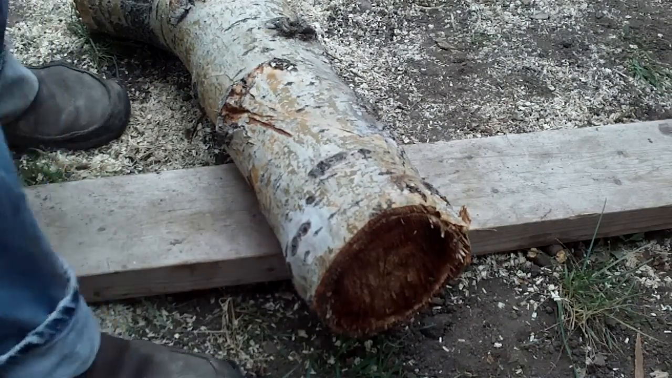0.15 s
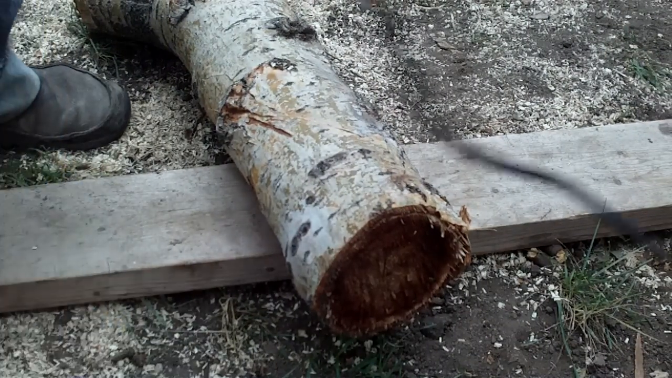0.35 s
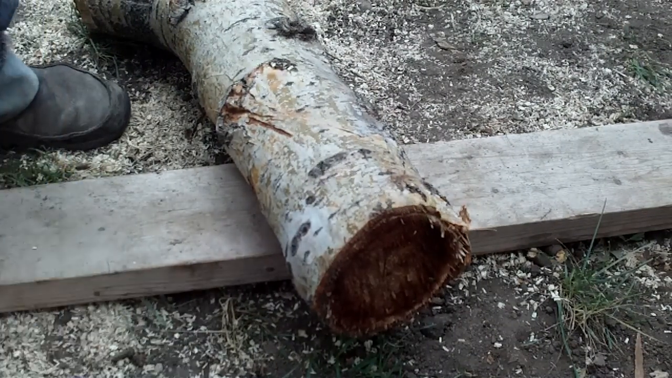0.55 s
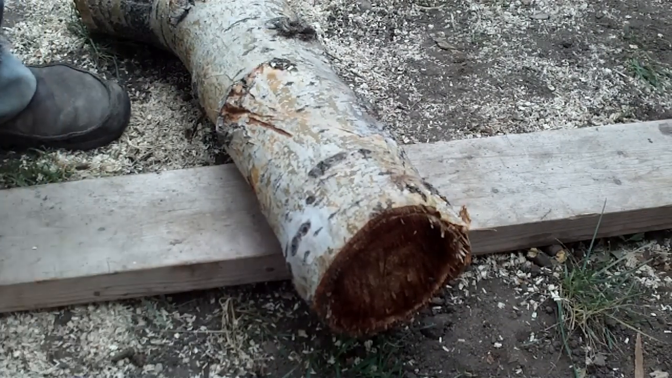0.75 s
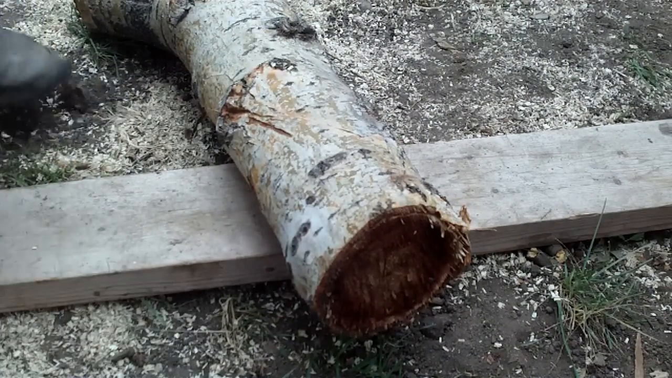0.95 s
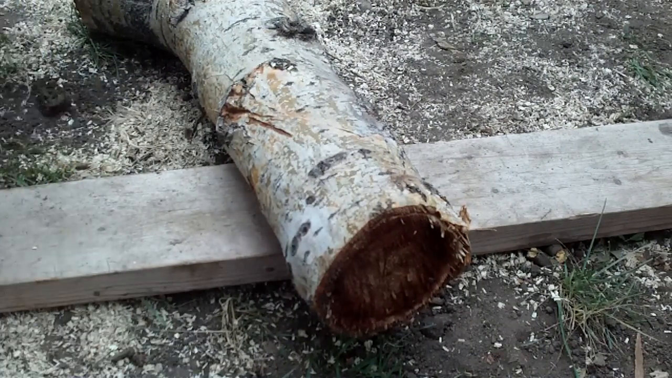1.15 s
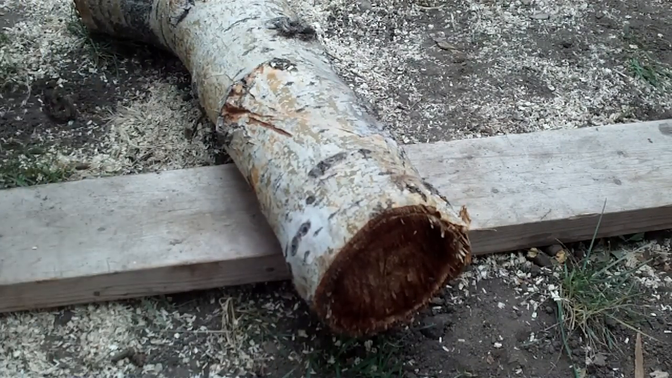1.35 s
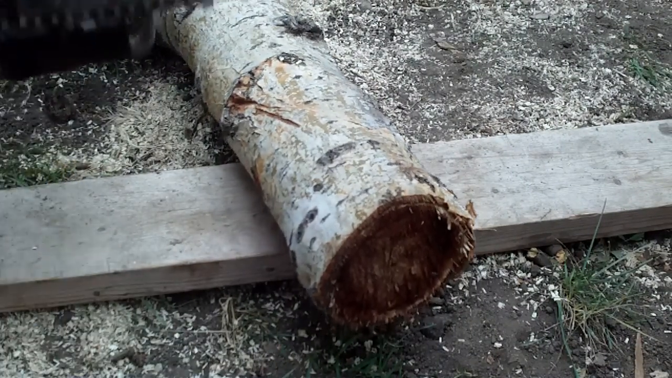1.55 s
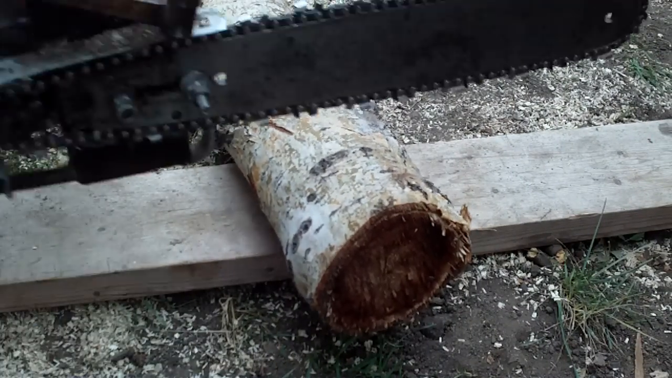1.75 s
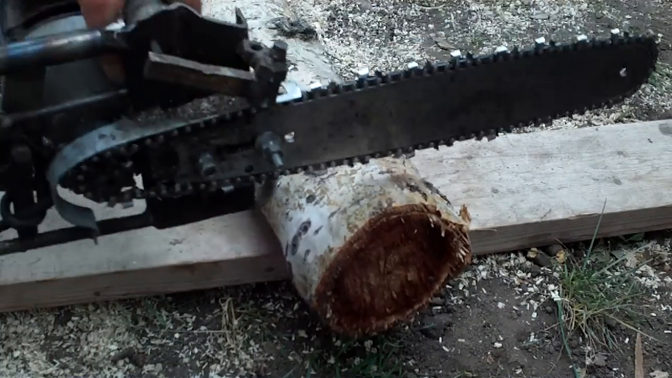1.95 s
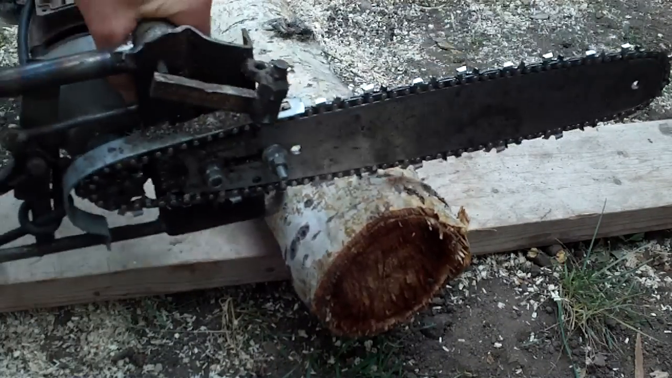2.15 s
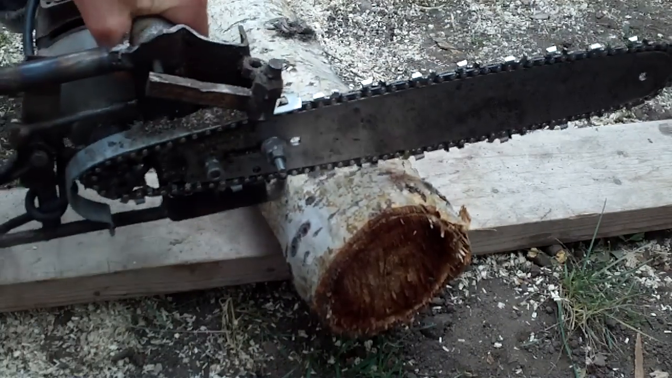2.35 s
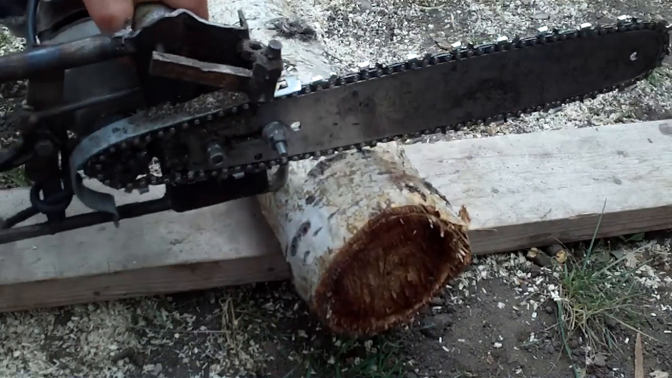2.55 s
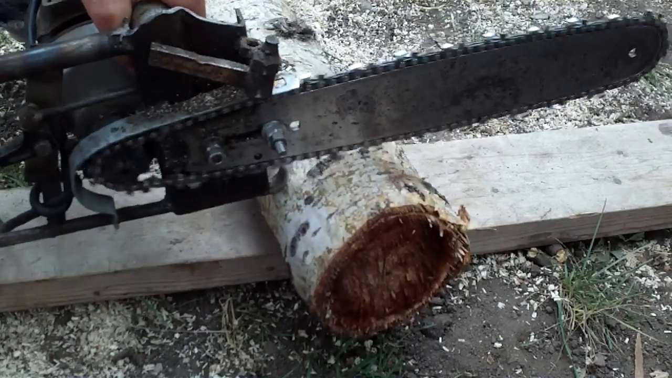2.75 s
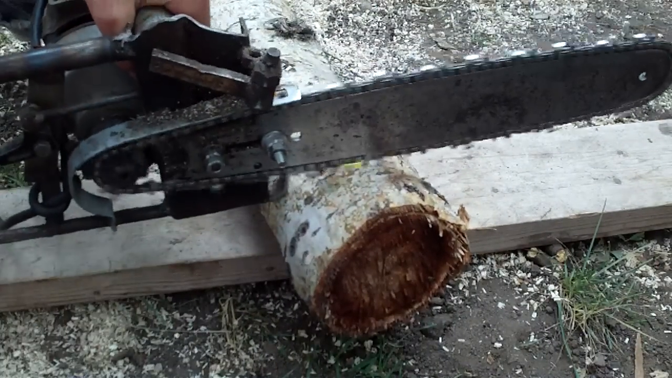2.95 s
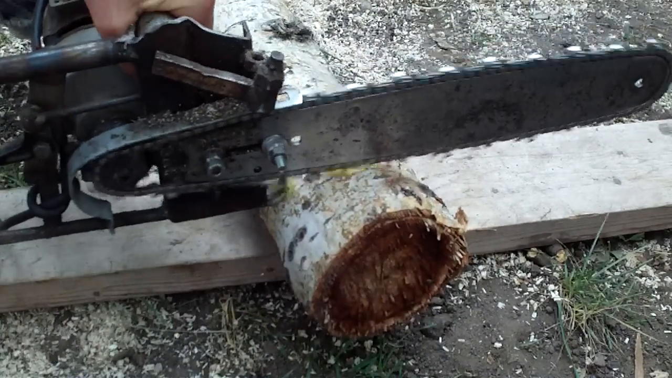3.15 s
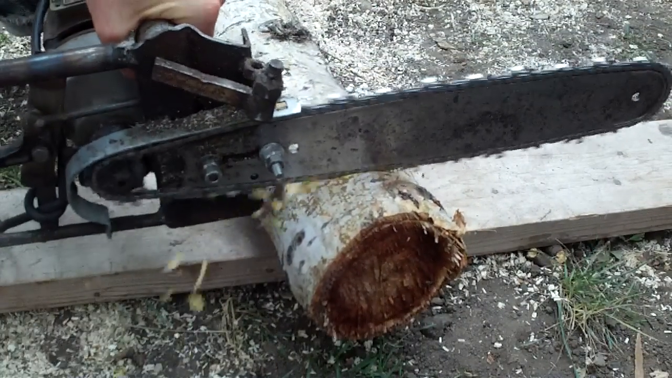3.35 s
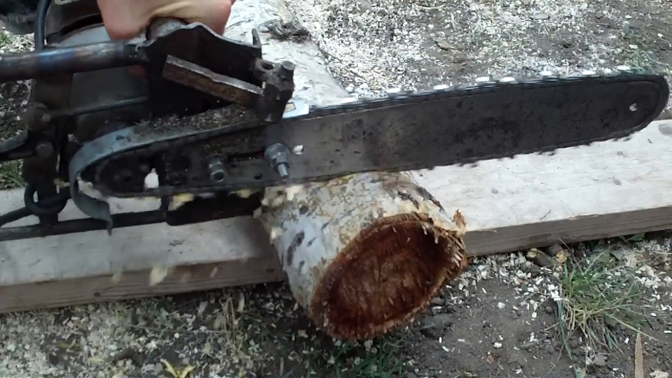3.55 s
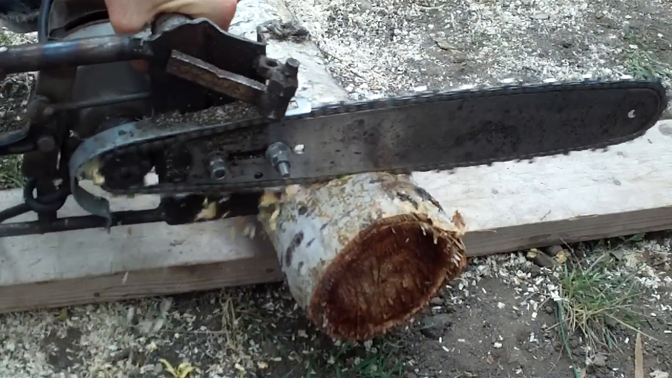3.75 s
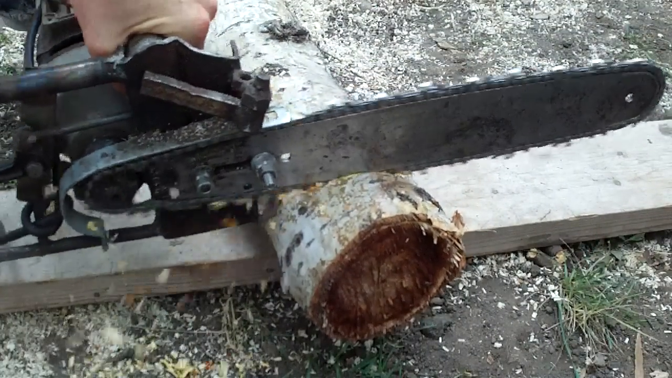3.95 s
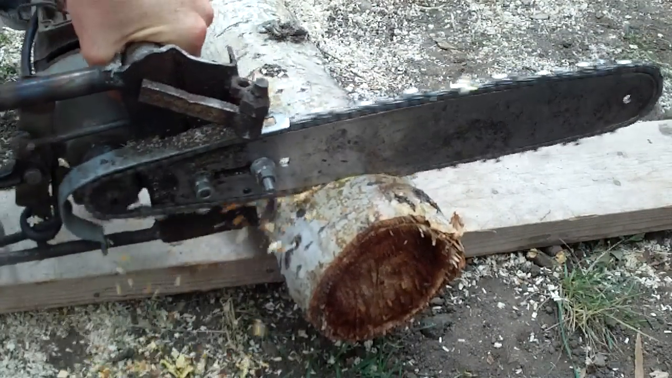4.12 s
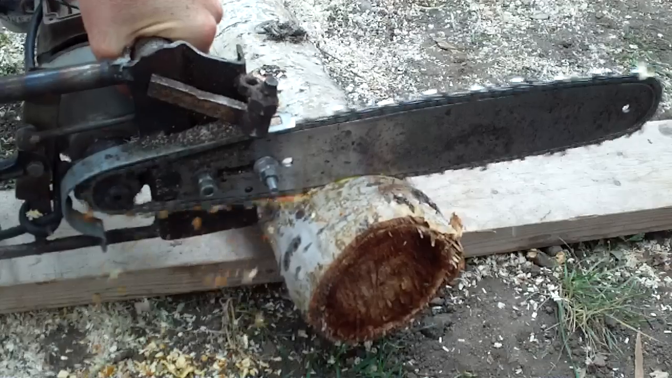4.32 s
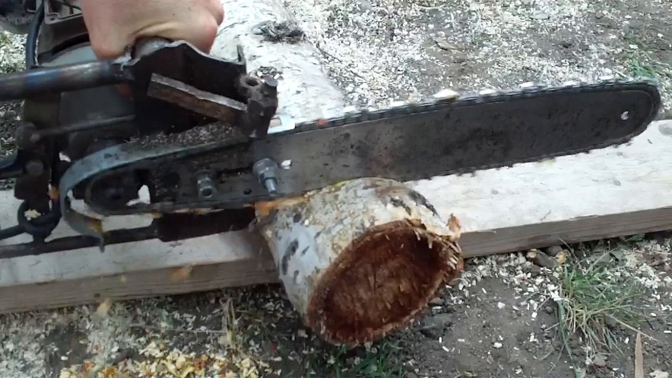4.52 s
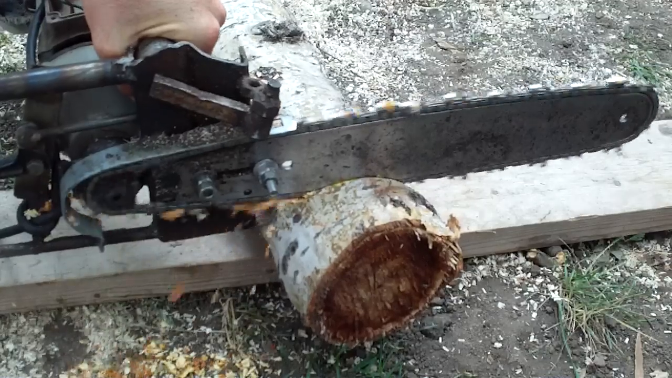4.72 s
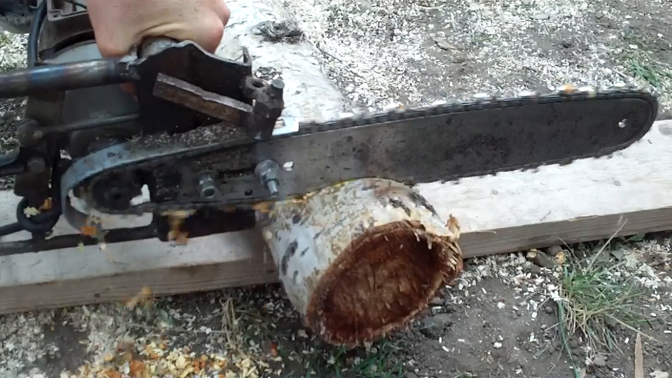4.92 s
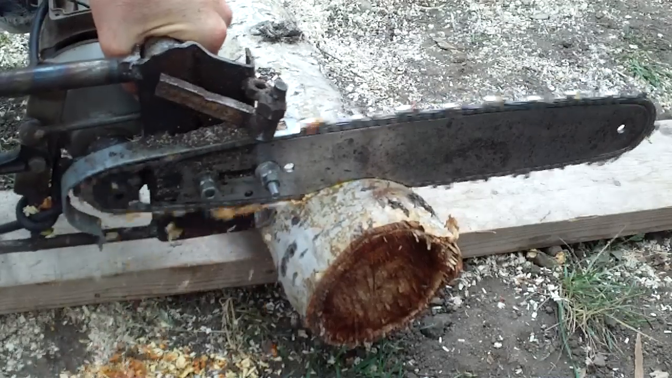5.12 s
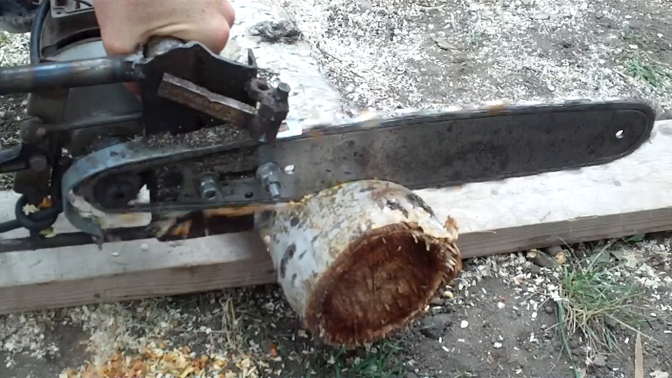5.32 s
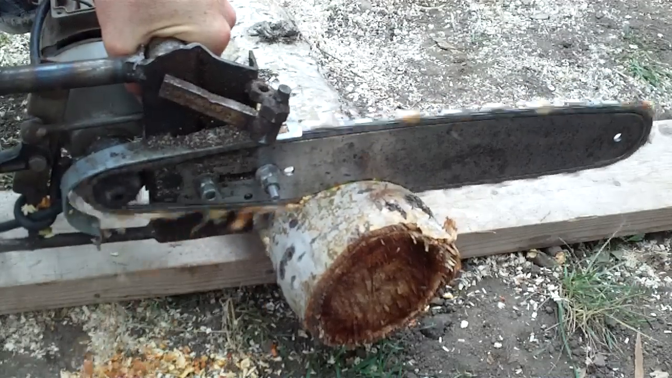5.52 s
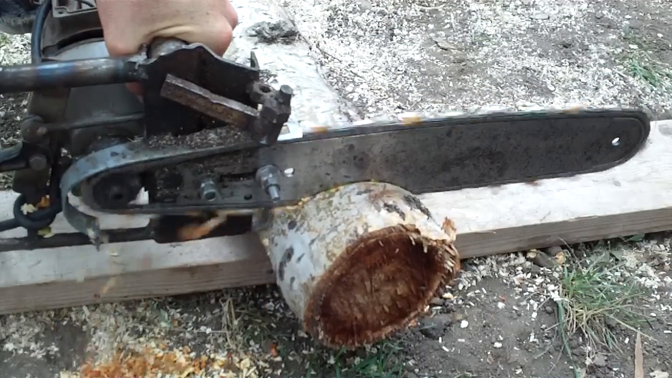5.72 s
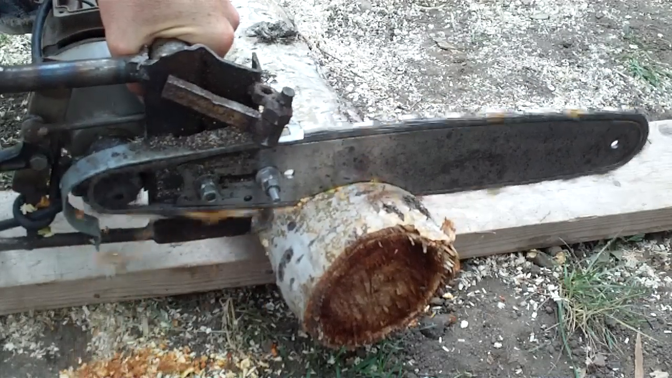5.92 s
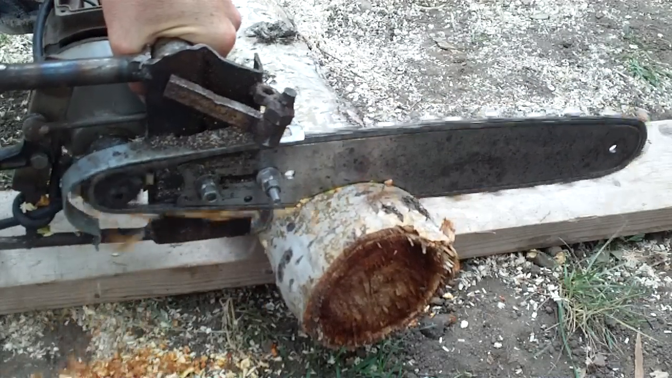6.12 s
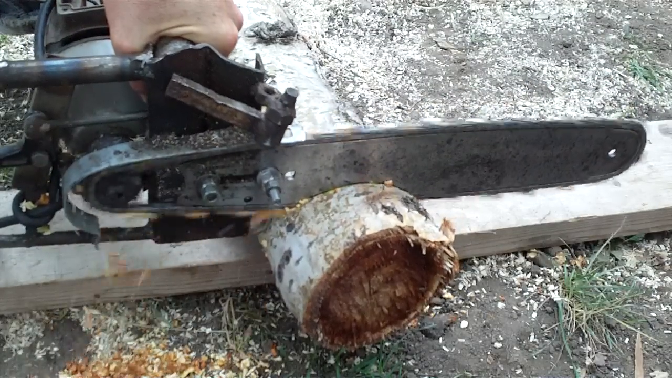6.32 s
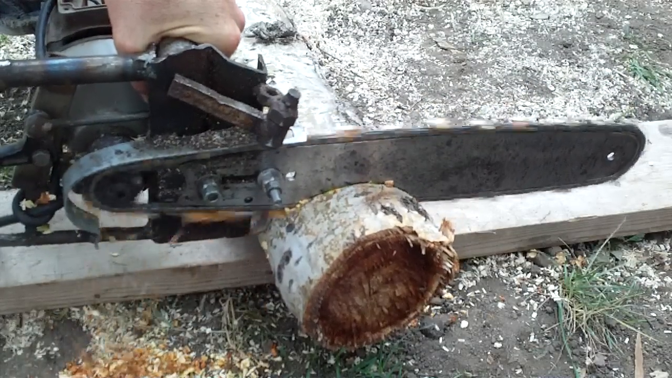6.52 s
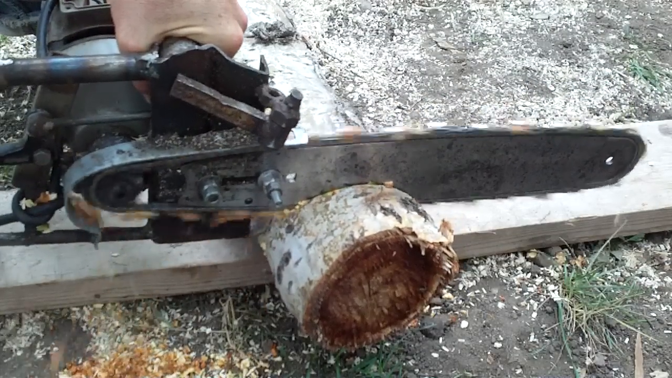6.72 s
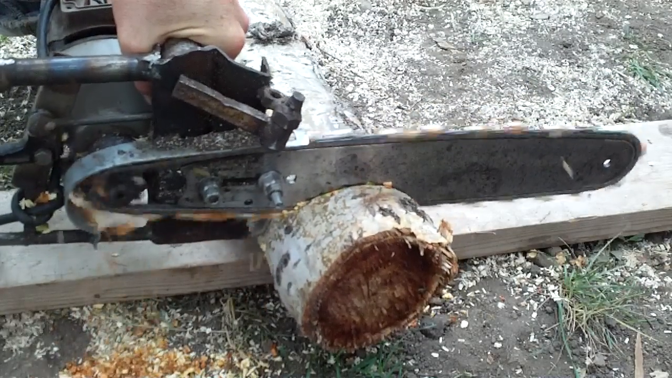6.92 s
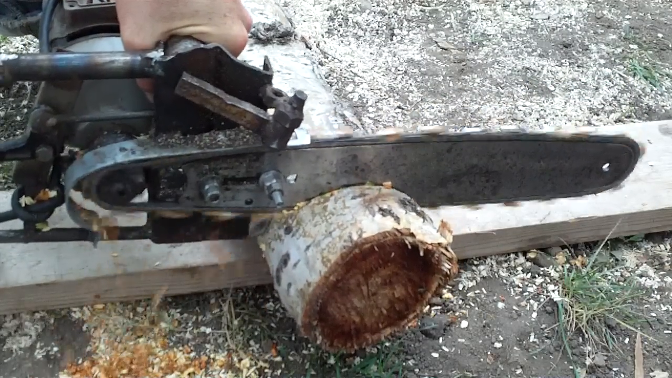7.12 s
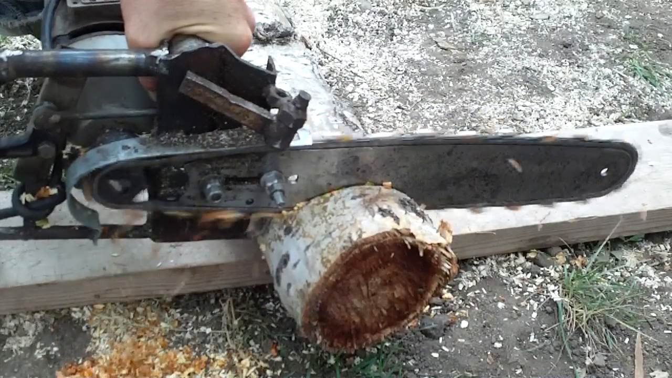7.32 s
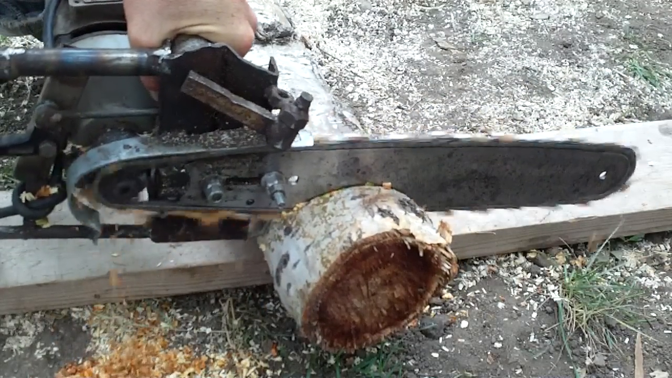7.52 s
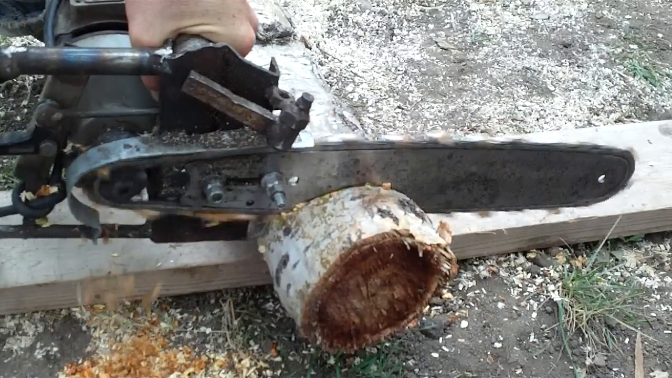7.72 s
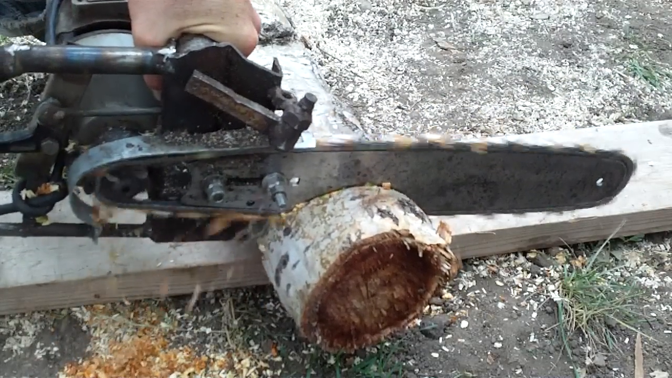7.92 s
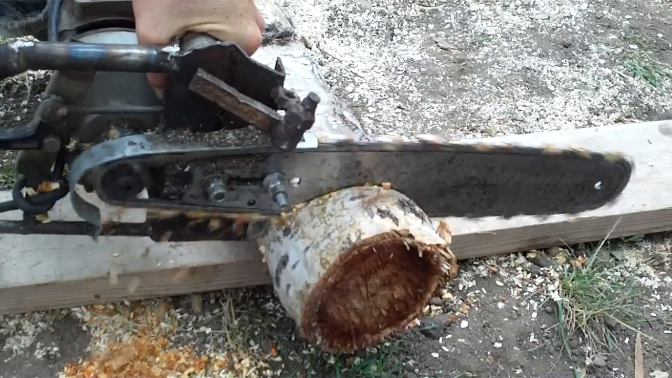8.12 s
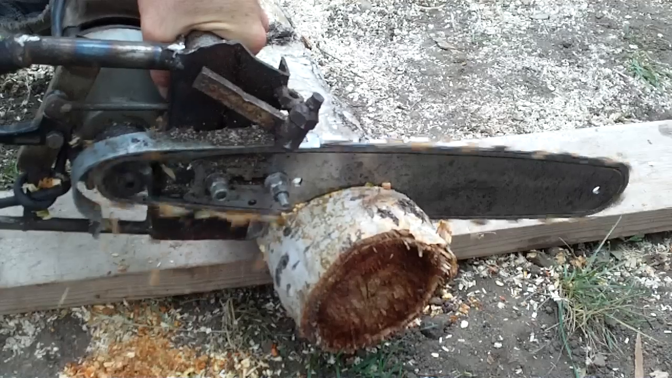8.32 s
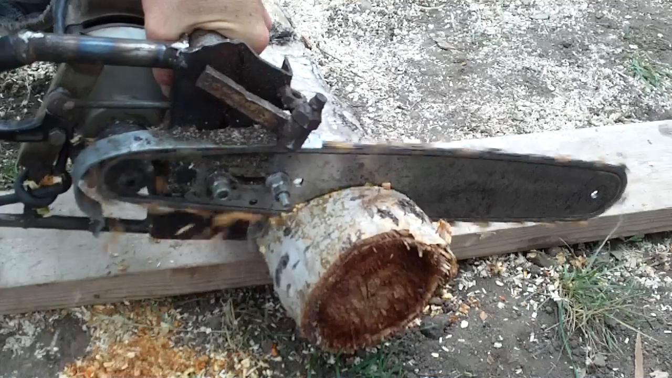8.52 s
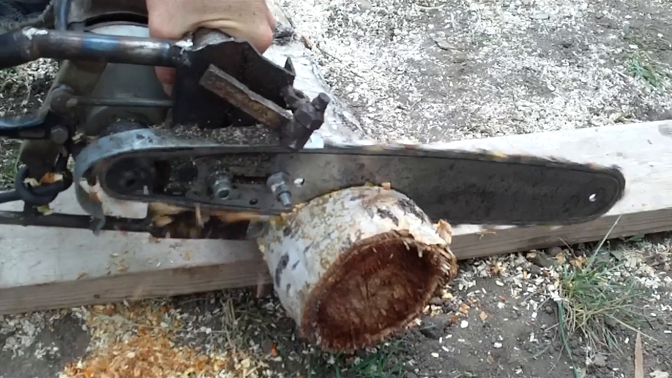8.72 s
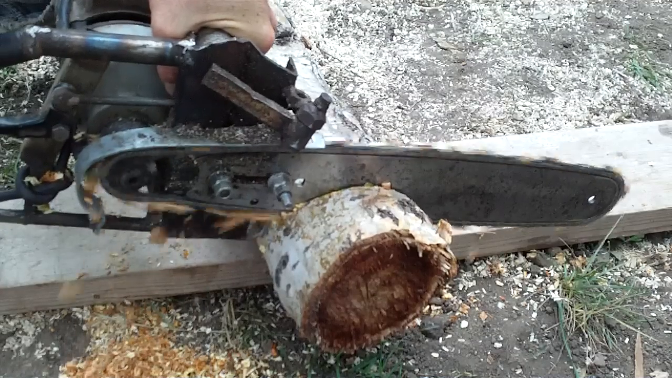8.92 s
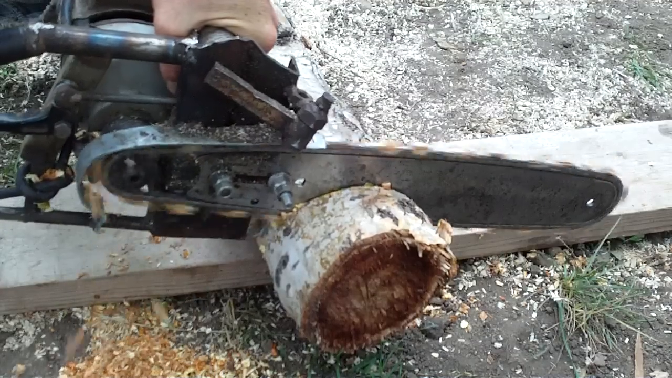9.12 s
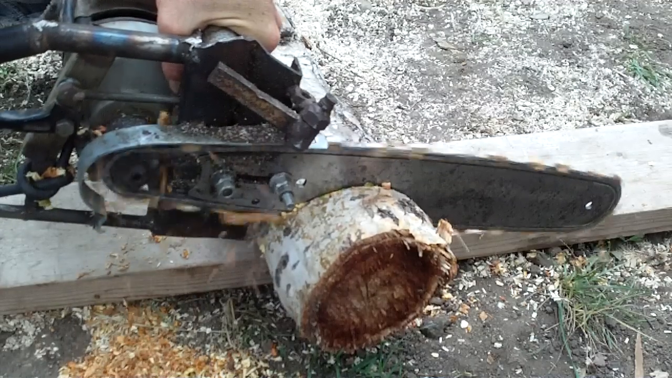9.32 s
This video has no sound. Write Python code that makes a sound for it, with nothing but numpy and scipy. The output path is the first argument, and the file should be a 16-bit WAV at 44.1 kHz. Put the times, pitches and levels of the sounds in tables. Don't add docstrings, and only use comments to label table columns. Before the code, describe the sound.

Outdoors in a yard, a small engine drones low in the distance while sparrows chirp and clothes rustle. Faint knocks, scuffs and ticks come from handling a saw, then a sharp ringing clink of its steel bar. A switch cracks and an electric motor races up to a piercing whine; the chain bites the log, the pitch sags and rough, hissing cutting continues to the end. Close microphone, light wall echo.

```python
import sys
import numpy as np
from scipy import signal
from scipy.fft import rfft, irfft
from scipy.io import wavfile
from scipy.ndimage import uniform_filter1d, map_coordinates

SR = 44100
rng = np.random.default_rng(int(sys.argv[2]) if len(sys.argv) > 2 else 0)


def dump(signal):
    limited = np.clip(np.atleast_2d(signal).T, -1, 1)
    pcm = np.round(limited * 32767).astype(np.int16)
    wavfile.write(sys.argv[1], SR, pcm)


def to_linear_factor(level_db):
    exponent = np.asarray(level_db, float) / 20
    return 10 ** exponent


N = 417186
T_S = np.arange(N) / SR
BARS, TEETH = 12, 9
LEAD = SR // 10


def unit(x):
    return x / np.sqrt(np.mean(x ** 2) + 1e-20)


def along(points, hz):
    f, v = np.transpose(points)
    return np.interp(np.log(hz + 1), np.log(f + 1), v)


def curves(rows):
    s, *cols = np.transpose(rows)
    return [np.interp(T_S, s, col) for col in cols]


def bumps(rows):
    return sum(size * np.exp(-((T_S - s) / half) ** 2) for s, size, half in rows)


def bells(hz, modes):
    return sum(db / (1 + (2 * (hz - centre) / width) ** 2) for centre, width, db in modes)


def wobble(rate):
    knots = rng.standard_normal(int(N * rate / SR) + 4)
    return map_coordinates(knots, [np.arange(N) * rate / SR])


def rush(spectrum, patchy_db, drive=1):
    hz, _, z = signal.stft(drive * rng.standard_normal(N), SR, nperseg=512)
    field = uniform_filter1d(rng.standard_normal(z.shape), 6, 0)
    field = uniform_filter1d(field, 10, 1)
    colour_db = along([(1, -120), *spectrum, (SR / 2, -120)], hz)
    z = z * to_linear_factor(patchy_db * unit(field) + colour_db[:, None])
    return unit(signal.istft(z, nperseg=512)[1][:N])


def tone(turns, order, db, flutter_db, rate):
    phase = 2 * np.pi * (order * turns + rng.random()) + 0.23 * wobble(4 * rate)
    return np.sqrt(2) * to_linear_factor(db + flutter_db * wobble(rate)) * np.sin(phase)


def faint(turns, order, db, drift_db):
    knots = rng.standard_normal(36)
    drift = np.interp(np.linspace(0, len(knots) - 1, N), np.arange(len(knots)), knots)
    return np.sqrt(2) * to_linear_factor(db + drift_db * drift) * np.sin(2 * np.pi * (order * turns + rng.random()))


def motor():
    # (time [s], bar-passing speed lost [Hz])
    sag = [(3.204, 0), (3.356, 79), (3.757, 277), (4.018, 289), (4.187, 364), (4.212, 410), (4.683, 525),
           (5.124, 511), (5.374, 587), (5.674, 626), (6.211, 640), (6.388, 602), (6.837, 654), (6.95, 722),
           (7.783, 699), (8.38, 813), (9.286, 665), (9.377, 697)]
    # (time [s], speed lost [Hz], half length [s])
    bites = [(2.745, 130, .065), (3.593, 18, 0.087), (4.25, 23, 0.033), (5.553, 78, 0.07),
             (5.928, 28, 0.165), (6.248, 19, 0.063), (6.898, 68, 0.063), (7.127, -20, 0.054),
             (7.362, 55, 0.098), (7.601, 54, 0.107), (8.355, 42, 0.05), (8.487, -49, 0.158),
             (8.772, 57, 0.12), (8.955, 52, 0.085)]
    # (time [s], speed lost [Hz], half length [s])
    tugs = [(3.43, -9, 0.025), (3.62, 4, 0.06), (3.84, 5, 0.025), (3.93, -7, 0.025), (4.37, 6, 0.025),
            (4.69, -6, 0.025), (4.9, 5, 0.025), (4.97, -7, 0.025), (5.11, 7, 0.025), (5.75, -5, 0.025),
            (5.81, 5, 0.025), (5.9, -7, 0.025), (5.97, 8, 0.025), (6.75, 6, 0.025), (6.87, 9, 0.025),
            (6.91, -5, 0.025), (7.23, 6, 0.025), (7.29, -6, 0.025), (7.36, 6, 0.025), (7.5, 5, 0.025),
            (7.65, 5, 0.025), (7.81, -11, 0.025), (7.91, 7, 0.06), (8.21, -8, 0.025), (8.59, -6, 0.025),
            (8.66, 5, 0.025), (8.8, 6, 0.025), (8.87, -5, 0.025), (9.16, -6, 0.025)]
    # (shaft order [-], level at full speed [dB])
    side_orders = [(7.45, -41), (10, -44), (11.2, -43), (12.75, -48), (13, -45), (21.05, -48), (22, -46),
                   (23, -50), (26, -46), (29, -48), (30.05, -45), (33.15, -49), (35.45, -49), (36.55, -49),
                   (38, -47), (39.1, -50), (43, -54), (44, -53), (45, -51), (46, -53), (49, -51), (50, -51),
                   (51, -52), (55, -50), (57, -53), (58, -54), (59, -52), (60.5, -54), (62, -60), (63, -57)]
    # (shaft order [-], time [s], lift [dB], half length [s])
    swells = [
        (7.45, 5.2, 9.5, .35),
        (13, 5.5, -8, .2),
        (44, 4.75, 5, .3),
        (50, 4.7, 6, .3),
    ]
    free_hz = 3432.6
    bar_hz = free_hz * spin() - curves(sag)[0] - bumps(bites) - bumps(tugs) + 2.22 * wobble(35)
    turns = np.cumsum(bar_hz / BARS) / SR
    load = np.clip((3250 - bar_hz) / 500, 0, 1)

    mesh_db, *partials_db = partial_levels(bar_hz)
    whine = sum(tone(turns, BARS * (k + 1), db, 1 + 0.2 * k, 40 - 4 * k) for k, db in enumerate(partials_db))

    gear = tone(turns, TEETH, mesh_db, 1.1, 60)
    for k, case_hz in (2, 4220), (3, 6100):
        order = k * TEETH
        lift_db = 10 / (1 + ((order * bar_hz / BARS - case_hz) / 130) ** 2)
        gear += tone(turns, order, mesh_db - 22 + lift_db + grip(order), 1, 20)
    slack_db = bumps([(2.775, 40, 0.034)]) - 76
    gear += tone(turns, 2 * TEETH, slack_db, 4, 80)

    unbalance = tone(turns, 1, -46 - 9 * load, 2.5, 5) * running(3)
    spin_db = np.minimum(60 * np.log10(bar_hz / 2600), 0) + bumps([(2.95, -4, 0.31)])
    orders = 0
    for order, db in side_orders:
        swell_db = bumps([row[1:] for row in swells if row[0] == order])
        orders = orders + faint(turns, order, spin_db + db + 1 + swell_db, 4.5)
    return running(2.73) * (whine + gear + unbalance + orders)


def running(start_s):
    return np.clip((T_S - start_s) / 0.023, 0, 1)


def spin():
    switch_s, spin_up_s = 2.6856, 0.1932
    return np.clip(1 - np.exp((switch_s - T_S) / spin_up_s), 0.1, 1)


def partial_levels(bar_hz):
    air_db = [-53, -19.5, -36.5, -49.5, -74, -72]
    wood_db = [-27.5, -28, -22.5, -41, -39.5, -37.5]
    # (centre [Hz], width [Hz], lift [dB])
    free_shell = [(910, 530, -26), (1400, 95, 11), (1910, 2100, -10), (2320, 120, -17), (2490, 120, 9.5),
                  (3630, 680, 0), (5570, 270, 12.5), (6290, 300, 13), (7700, 1200, 21.5), (14300, 5500, 37)]
    # (centre [Hz], width [Hz], lift [dB])
    cut_shell = [(2666, 120, 9), (2738, 29, 5.5), (2928, 121, -19), (3066, 132, 10), (3277, 158, 13.5),
                 (5727, 160, 10.5), (5742, 68, -32), (6120, 79, -17), (8110, 880, 17), (9447, 130, 7),
                 (11000, 490, 9), (11560, 330, 6), (11980, 38, 10), (14620, 740, 15.3)]
    # (centre [Hz], width [Hz], lift [dB])
    gear_case = [(1984, 35, 6), (2046, 57, 7.5), (2244, 40, -23), (2350, 34, 6.5)]
    # (time [s], half length [s], lift [dB])
    shifts = [
        [(6.52, 0.28, 4)],
        [(5.28, 0.09, 4.5), (6.1, 0.12, -7), (6.86, 0.13, -3), (7.46, 0.96, -2.5)],
        [(2.78, 0.027, 7), (3.29, 0.089, -15), (3.49, 0.2, 3), (3.69, 0.031, -11), (3.89, 0.017, -7),
         (6.08, 0.23, -3.5), (7.43, .1, -6), (7.58, 0.82, -9), (8.79, 0.15, -7), (9.2, 0.35, 1)],
        [(5.69, 0.13, -5), (6.93, .07, -9), (7.44, 0.3, -3.5), (9.11, 0.096, -14), (9.44, 0.11, -11)],
        [(3.3, .15, 5), (3.85, .15, -11), (6.45, 0.12, 1), (8.7, 0.33, -6)],
        [(4.03, .12, 8), (5.7, 0.093, -6), (8.6, 0.59, -4)],
    ]
    contact_s, sink_in_s = 3.11, 0.11
    wood = np.clip((T_S - contact_s) / sink_in_s, 0, 1)
    levels = []
    for k, rows in enumerate(shifts):
        hz = k * bar_hz if k else bar_hz * TEETH / BARS
        free_db = air_db[k] + (bells(hz, free_shell) if k else 0)
        cut_db = wood_db[k] + bells(hz, cut_shell if k else gear_case)
        shift_db = bumps([(s, db, half) for s, half, db in rows])
        levels.append((1 - wood) * free_db + wood * cut_db + shift_db + grip(k * BARS or TEETH))
    return levels


def grip(order):
    # (shaft order [-], time [s], lift [dB], half length [s])
    holds = [(9, 2.9, -11, 0.08), (9, 4.57, -8.5, 0.03), (12, 3.4, 0, 0.015), (12, 3.92, 3.5, 0.055),
             (12, 4.75, 3, .35), (12, 6.66, 5, 0.11), (18, 5.34, 8, 0.11), (18, 5.55, -9, 0.03),
             (18, 8.8, 0, 0.08), (18, 9.26, -12, 0.15), (24, 2.815, -7, 0.013), (24, 2.87, 1.5, 0.04),
             (24, 2.94, 4.5, .03), (24, 3.8, -1, 0.024), (24, 4.57, -2.5, 0.058), (24, 5.33, -2.5, 0.04),
             (24, 5.59, -2.5, 0.074), (27, 4.41, 7.5, 0.22), (27, 4.8, 18, 0.16), (27, 6.22, -9.0, 0.08),
             (27, 7.12, -9, 0.067), (27, 7.34, 4, 0.05), (27, 7.84, -16, 0.13), (27, 7, -7.0, 0.05),
             (36, 2.87, 4.5, 0.04), (36, 4.29, 2, 0.13), (36, 4.74, -6, 0.22), (36, 7.14, 2.5, 0.067),
             (36, 8, -1.5, 0.35), (48, 3.1, 19, 0.015), (48, 2.97, 15, 0.11), (48, 3.65, 0, 0.41),
             (48, 5.06, 3.5, 0.11), (48, 6.55, -6.0, 0.32), (48, 7.88, -6.5, 0.14), (48, 7.8, 6, 0.1),
             (60, 2.93, 6, .09), (60, 3.12, 7, 0.08), (60, 3.78, -11, 0.16), (60, 3.9, 8, 0.05),
             (60, 4.51, -5.5, 0.03), (60, 4.6, -2, 0.22), (60, 6.3, 7.0, 0.08), (60, 6.35, -9, 0.4),
             (60, 6.9, 8.0, 0.05), (60, 7.27, -7.5, 0.05), (60, 7.53, -8.5, 0.13), (60, 9.38, -9, 0.08)]
    return bumps([row[1:] for row in holds if round(row[0]) == order])


def chain():
    # (frequency [Hz], density [dB per Hz])
    body_colour = [(40, -35), (70, -12), (170, -15), (240, -6), (420, -10), (800, 0.5), (1300, -3.5),
                   (1950, -3), (2400, -9.5), (3200, -45)]
    # (frequency [Hz], density [dB per Hz])
    teeth_colour = [(1700, -62), (2500, 2.5), (3420, -0.5), (4760, -1), (5600, -2), (7000, -6.5),
                    (8000, -2.5), (9500, -7)]
    # (frequency [Hz], density [dB per Hz])
    air_colour = [(7000, -26), (9000, -6), (11000, -1), (13200, -2.5), (15000, -5.5), (16500, -7)]
    # (time [s], level [dB])
    feed = [(3.0, 3), (3.3, 3), (3.7, 1.5), (4.02, 1), (4.4, 0), (5.15, 0.15), (5.79, -1), (6.57, -0.5),
            (7.01, -1), (8.73, -2), (9.05, -1.5), (9.38, 0), (9.46, -2)]
    # (time [s], lift [dB], half length [s])
    jolts = [(2.745, -3, .025), (2.758, 3, .004), (2.8, -3, .012), (2.817, 2, .006), (2.83, -1, .006),
             (2.849, 3.5, 0.0056), (2.929, -3, .006), (2.948, 2, .01), (2.99, 0, .011), (3.137, 1.5, .012),
             (3.222, 2.5, .006), (3.485, -2, .006), (3.93, 2, .006), (4.325, 2.5, .005), (4.418, 7, 0.0039)]
    run_db = 37.5 * np.log10(spin())
    effort_db = curves(feed)[0] + bumps(jolts)
    lag_db = bumps([(2.95, -1.4, 0.23)])
    body_db = run_db - 22.5 + 0.72 * effort_db + 0.61 * lag_db
    teeth_db = run_db - 24.1 + 0.86 * effort_db + lag_db
    air_db = run_db - 27.2 + 0.94 * effort_db + 1.7 * lag_db
    chips = to_linear_factor(0.65 * wobble(260) + 0.19 * wobble(45))
    slap = to_linear_factor(0.12 * wobble(15) + 1.8 * np.maximum(wobble(70) - 1.3, 0))
    body = to_linear_factor(body_db) * rush(body_colour, 0.42, chips)
    teeth = to_linear_factor(teeth_db) * rush(teeth_colour, 0.3, chips * slap)
    air = to_linear_factor(air_db) * rush(air_colour, 0.52, chips * slap)
    return running(2.71) * housing(body + teeth + air)


def housing(x):
    # (centre [Hz], width [Hz], lift [dB])
    modes = [(983, 30, 4), (1110, 197, -6.5), (1343, 137, 4.5), (1630, 96, -5.5), (1750, 260, 2.5),
             (2324, 54, 5), (2610, 130, -7), (3360, 140, -3.5), (3830, 110, -2), (4720, 380, 3.5),
             (6440, 1030, 4.5), (7000, 250, -0.5), (11800, 630, -3.5), (13200, 500, -3)]
    hz = np.fft.rfftfreq(N, 1 / SR)
    return irfft(rfft(x) * to_linear_factor(bells(hz, modes)), N)


def handling():
    # (time [s], part level [dB], part pitch [Hz], t60 [s])
    knocks = [(.1075, -47.5, 640, 0.04), (.559, -54, 1750, .03), (.724, -45, 880, .035),
              (1.4814, -37.5, 544, 0.04), (1.483, -48, 1400, 0.017), (2.219, -53, 2100, .02),
              (2.252, -56, 2100, .02), (2.392, -52, 1920, .04), (2.707, -28.5, 2380, 0.22)]
    # (time [s], part level [dB], part pitch [Hz], t60 [s])
    scuffs = [(.587, -54, 8500, .04), (.708, -45.5, 1820, 0.066), (2.4337, -48.5, 4500, 0.016),
              (2.584, -46, 4390, .018), (2.692, -43, 12200, 0.053)]
    # (time [s], part level [dB], part pitch [Hz], t60 [s])
    clicks = [(1.022, -51, 5800, 0.23), (1.144, -57, 12000, .02), (1.258, -60, 12000, .015),
              (2.0213, -61, 9500, .02), (2.0842, -37.5, 10500, 0.04), (2.1093, -39.5, 6260, 0.029),
              (2.4768, -54, 8760, .035), (2.4997, -50, 9670, 0.027), (2.5341, -57, 6600, .04),
              (2.571, -60, 7000, .02), (2.667, -60, 6000, 0.021), (2.051, -70, 7500, .02),
              (2.5965, -52, 8000, .035), (2.7058, -26.5, 14100, 0.036), (2.721, -40, 11000, .015),
              (2.7305, -37, 6800, .025)]
    # (time [s], part level [dB], part pitch [Hz], t60 [s])
    pings = [(1.0455, -44, 6500, 0.066), (1.047, -46, 15000, .04), (1.065, -28.5, 15200, 0.027),
             (1.066, -36, 13200, 0.032), (1.085, -38, 15000, .03), (1.2134, -52, 15000, .012),
             (1.234, -22.5, 9300, 0.011)]
    # (time [s], level [dB])
    clinks = [
        (1.6315, -40),
        (1.6424, -6),
        (1.661, -14.5),
    ]
    # (frequency [Hz], level [dB], t60 [s])
    steel = [(3000, -19, 0.12), (3830, -9, 0.064), (4060, -17, 0.1), (4420, -12, 0.14), (5200, -16, 0.044),
             (5750, -8, .045), (6200, -5, .04), (6900, -1, 0.036), (7660, -6, 0.12), (9100, -4, 0.15),
             (11140, -18, .05), (11900, -13, .05), (12300, 1, .05), (13570, -10, .045)]
    # (contacts, crack over the part [dB], thud over the part [dB], sharpness Q)
    kinds = [(knocks, -22, -7.5, 8.8), (scuffs, 2.2, 0, 3), (clicks, 7.5, -13.5, 12), (pings, -6, -26, 27)]
    out, t = np.zeros(N + SR), np.arange(SR // 4) / SR
    dull = signal.butter(2, [250, 1100], "band", fs=SR)
    bright = signal.butter(2, 3000, "high", fs=SR)
    for rows, crack_db, thud_db, q in kinds:
        for s, part_db, hz, t60 in rows:
            noise = rng.standard_normal((3, len(t)))
            crack = signal.lfilter(*bright, noise[0]) * to_linear_factor(part_db + crack_db - 60 * t / t60)
            part = unit(signal.lfilter(*signal.iirpeak(hz, q, SR), noise[1]))
            part = part * to_linear_factor(part_db - 60 * t / (1.7 * t60))
            thud = unit(signal.lfilter(*dull, noise[2]))
            thud = thud * to_linear_factor(part_db + thud_db - 60 * t / (t60 + 0.049))
            onset = 1 - np.exp(-t / (0.5 * t60 ** 2))
            out[round(s * SR):][:len(t)] += (crack + part + thud) * onset
    sharp = signal.butter(4, 1000, "high", fs=SR)
    for s, db in clinks:
        ring = 0
        for hz, mode_db, t60 in steel:
            rattle = 0.065 * np.cumsum(rng.standard_normal(len(t)))
            decay = to_linear_factor(mode_db + rng.normal(0, 1.5) - 60 * t / t60)
            ring = ring + decay * np.sin(2 * np.pi * hz * t + rattle)
        crack = signal.lfilter(*sharp, rng.standard_normal(len(t)))
        crack = crack * (0.45 * to_linear_factor(-60 * t / 0.044) + 0.21 * to_linear_factor(-60 * t / 0.13))
        out[round(s * SR):][:len(t)] += to_linear_factor(db - 14.5) * (ring + crack)
    return out[:N]


def engine():
    # (time [s], firing rate [Hz], level [dB], odd order change [dB])
    run = [(0, 25.98, -40, -1.5), (2.7, 25.86, -41, -3.5), (3.5, 26.04, -40.5, -10),
           (4.5, 26.54, -41.5, -1), (9.46, 26.87, -42, -26)]
    # (firing order [-], level [dB])
    firing = [(1, -9), (2, 0.5), (3, -7.5), (4, -18), (5, -4), (6, -7.5), (7, -14.5), (9, -21.5)]
    # (time [s], frequency [Hz], level [dB])
    hum = [(0.1, 107.8, -41.5), (1.13, 109.2, -41), (1.55, 107.3, -41), (2.77, 107.1, -43.5),
           (3.52, 107.2, -36.5), (4.06, 107.0, -43), (4.24, 111.0, -44), (5.15, 109.7, -37),
           (5.72, 108.5, -50), (6.13, 109.9, -38.5), (6.26, 113.5, -57), (6.45, 109.5, -51),
           (6.78, 109.9, -34.5), (7.58, 109.1, -54), (7.9, 110.1, -38), (8.21, 109.0, -52),
           (8.72, 111.2, -43), (9.4, 107.6, -42)]
    # (hum order [-], level [dB])
    hum_orders = [(1, -3), (2, -9.5), (3, -24), (4, -30), (5, -32)]
    firing_hz, db, odd_db = curves(run)
    turns = np.cumsum(firing_hz) / SR
    drone = sum(tone(turns, k, db + level + odd_db * (k > 2) * (k % 2), 0.85, 8) for k, level in firing)

    hum_hz, hum_db = curves(hum)
    field = np.cumsum(hum_hz * (1 + 0.005 * wobble(2.5))) / SR
    steady_db = uniform_filter1d(hum_db, 2 * SR)
    octave_db = bumps([(1.54, 5.0, 0.2), (2.75, 4.0, 0.22), (4.0, 4, 0.7), (0.56, -1.5, 0.5),
                       (1.35, -5.5, 0.14)])
    for k, level in hum_orders:
        order_db = (hum_db if k == 1 else steady_db) + level + (k == 2) * octave_db
        drone = drone + tone(field, k, order_db, 2.2, 2.4)
    return drone


def sparrows():
    # (time [s], length [s], top pitch [Hz], level [dB])
    arches = [
        (-.055, 0.045, 5740, -45.5),
        (1.422, 0.051, 5860, -49.5),
        (1.507, 0.055, 5200, -52),
        (2.136, .047, 5830, -48.5),
        (2.22, 0.041, 4870, -55),
    ]
    # (time [s], length [s], start pitch [Hz], end pitch [Hz], level [dB])
    peeps = [
        (0.054, 0.027, 3960, 4450, -54),
        (0.109, .1, 1900, 3400, -68),
        (2.68, .014, 5300, 6300, -58),
        (0.917, .03, 8300, 7660, -55),
        (1.255, .04, 2750, 3150, -65),
        (2.002, .085, 9900, 11900, -71),
    ]
    # (time [s], length [s], start pitch [Hz], end pitch [Hz], level [dB])
    falls = [
        (1.87, 0.054, 5400, 3300, -61),
        (2.61, .045, 5400, 3400, -57),
    ]
    out, t = np.zeros((2, N)), (np.arange(N) - LEAD) / SR
    rasp_db, trill_hz = 4 * wobble(500), 90 * wobble(300)
    calls = [(s, length, 0.66 * hz, hz, 0.68 * hz, db, 1) for s, length, hz, db in arches]
    for rows, hoarse in (peeps, 0.45), (falls, 3):
        calls += [(s, length, a, (a + b) / 2, b, db, hoarse) for s, length, a, b, db in rows]
    for s, length, start_hz, top_hz, end_hz, db, hoarse in calls:
        u = np.clip((t - s) / length, 0, 1)
        v = u ** 0.61
        hz = start_hz * (1 - v) * (1 - 2 * v) + 4 * top_hz * v * (1 - v) + end_hz * v * (2 * v - 1)
        phase = 2 * np.pi * np.cumsum(hz + hoarse * trill_hz) / SR
        lower = phase - 2 * np.pi * np.cumsum(0.095 * top_hz * np.sin(np.pi * v)) / SR
        voice = np.sin(phase) + (hoarse == 1) * 0.43 * np.sin(lower) + 0.26 * np.sin(2 * phase)
        swell = np.abs(np.sin(np.pi * u ** 0.72)) ** 0.5 * (u < 1)
        out[int(hoarse > 2)] += to_linear_factor(db + min(hoarse, 1.5) * rasp_db) * swell * voice
    return out


def echoes(x):
    # (frequency [Hz], t60 [s])
    walls = [(300, .25), (4000, 0.41), (12000, 0.17)]
    hz, t, z = signal.stft(rng.standard_normal(SR // 2), SR, nperseg=256)
    tail = signal.istft(z * to_linear_factor(-60 * t / along(walls, hz)[:, None]), SR, nperseg=256)[1]
    return signal.fftconvolve(np.pad(x, (300, 0)), tail / np.linalg.norm(tail))[:N]


def yard():
    # (time [s], level [dB])
    rustle = [(0.0, 1), (0.21, 5.5), (0.42, 2), (0.95, -0.5), (1.08, 1), (2.01, -1), (2.34, 1), (2.5, 2.5),
              (2.75, 2)]
    # (frequency [Hz], density [dB per Hz])
    rumble = [(12, -20), (25, 0), (70, 3), (150, -14), (260, -9.5), (400, -32)]
    move_db, = curves(rustle)
    low = rush([(200, -26), (300, 1.0), (1000, -10), (3000, -16), (6000, -23.0)], 1.6)
    high = rush([(2500, -23), (5000, -1), (9000, -1), (16000, -4)], 1.5, to_linear_factor(0.98 * wobble(150)))
    far = to_linear_factor(-55.0) * rush(rumble, 4.6)
    return far + to_linear_factor(-59.5 + 0.4 * move_db) * low + to_linear_factor(-68.5 + 1.2 * move_db) * high


def scene():
    (birds, far), hands = sparrows(), handling()
    extra_path_s = 0.012
    by_walls = echoes(to_linear_factor(-2.2) * np.roll(birds, round(extra_path_s * SR)) + far)
    flock = np.pad((to_linear_factor(-3.5) * birds + by_walls)[LEAD:], (0, LEAD))
    mono = motor() + chain() + hands + echoes(to_linear_factor(-22) * hands) + engine() + flock + yard()
    return np.array([mono, mono])


def top_cut(x):
    return signal.sosfilt(signal.butter(12, 16760, fs=SR, output="sos"), x)


def record(dry):
    whistle = to_linear_factor(-80) * np.sin(2 * np.pi * 12050 * T_S)
    return top_cut(dry + whistle)


dry = scene()
out = record(dry)
dump(out)
```